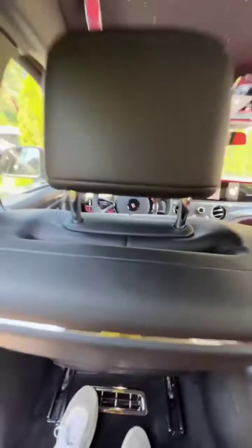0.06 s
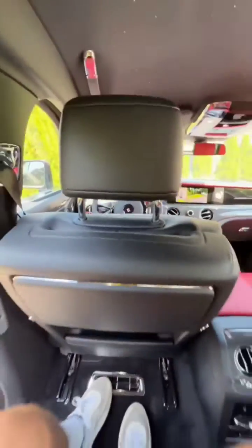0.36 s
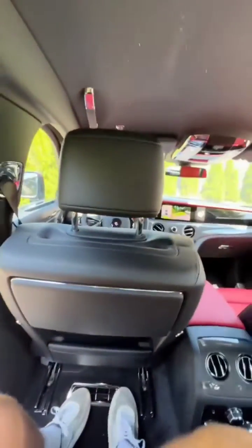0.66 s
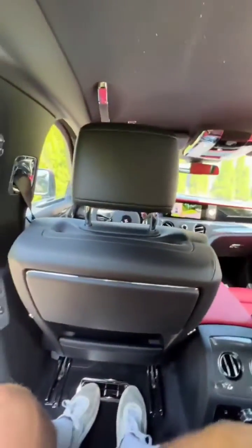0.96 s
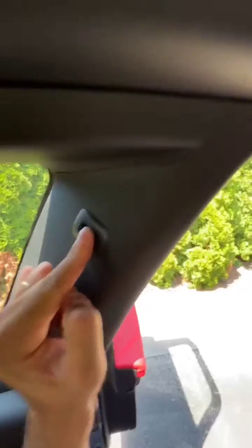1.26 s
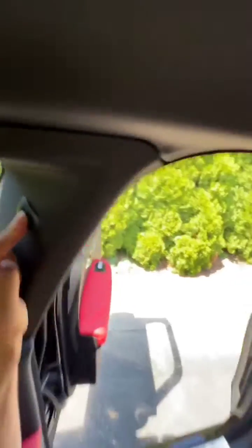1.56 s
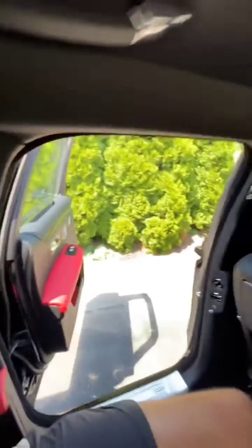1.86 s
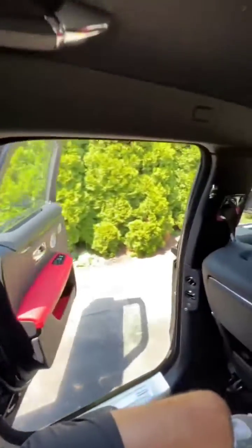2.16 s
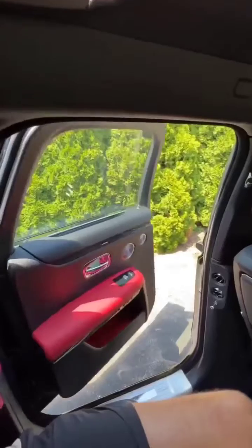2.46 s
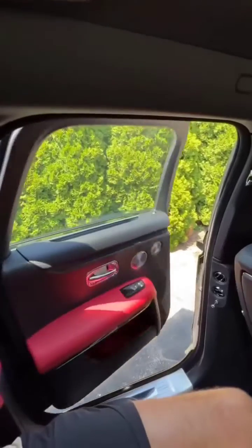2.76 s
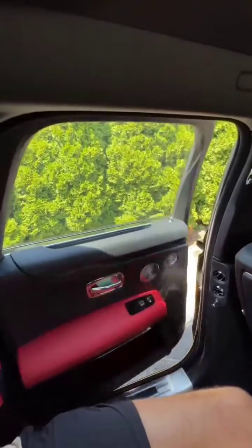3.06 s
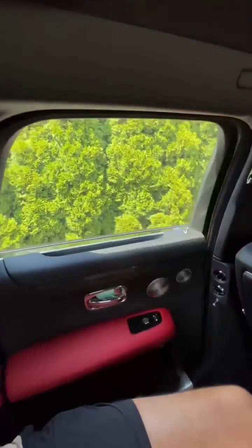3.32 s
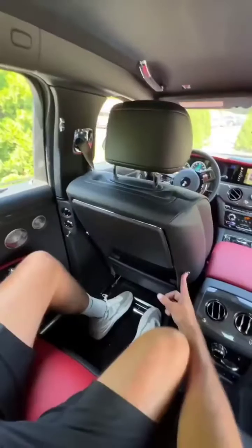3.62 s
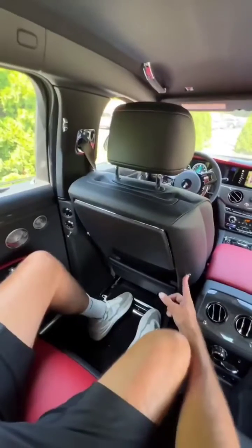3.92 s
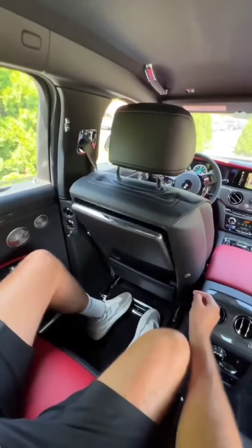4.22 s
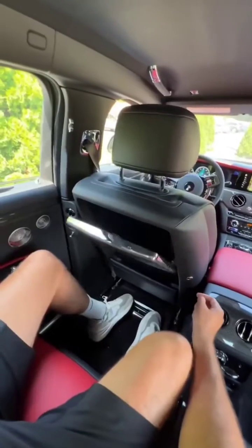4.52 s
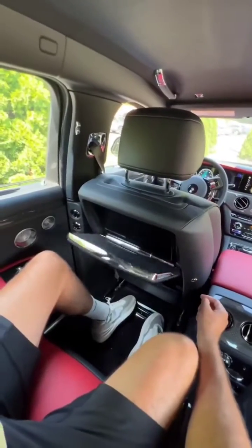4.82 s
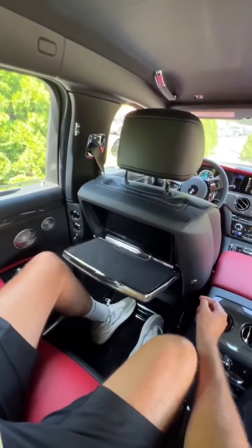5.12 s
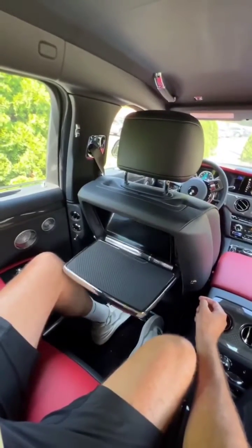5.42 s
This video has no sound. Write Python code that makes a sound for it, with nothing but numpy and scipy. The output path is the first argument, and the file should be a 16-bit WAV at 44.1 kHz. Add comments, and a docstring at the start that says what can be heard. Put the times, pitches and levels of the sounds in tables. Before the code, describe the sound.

From the back seat of a parked car, a low idling throb mixes with outdoor rumble and soft hiss through the open door. At about 1.1 seconds a button clicks sharply with a small thud. The powered door starts to whir, shifting to a drone from around 2.3 seconds while the outside hiss fades. At 3.5 seconds it bumps its seal and latches with a hard clack and a deep cabin boom, the loudest moment. Near 3.7 seconds the sound cuts abruptly to the low rumble of the closed cabin. At 4 seconds a switch knocks, then a catch clicks, ticks lightly, and a hinge clatters briefly at 4.3 seconds. Meanwhile a geared motor hums with a faint whine and buzz as it lowers a folding table, growing louder and brighter from 4.6 seconds. The tray knocks softly on its stop at about 5.7 seconds.

```python
"""Powered car door and picnic table

From the back seat of a parked car, the engine idles and outdoor noise comes through the open door.
A button clicks and the door whirs in, shutting out the hiss; it latches and the cabin booms.
The scene cuts abruptly to the closed cabin, where a switch knocks, a catch lets go
and a geared motor hums and whines as it lowers the table's tray onto its stop."""
import sys
import numpy as np
from scipy import signal
from scipy.fft import rfft, irfft
from scipy.io import wavfile
from scipy.ndimage import uniform_filter1d, map_coordinates

SR = 44100
rng = np.random.default_rng(int(sys.argv[2]) if len(sys.argv) > 2 else 0)


def transcribe(signal):
    """Save signal, clipped to [-1, 1], as a 16-bit WAV file at the path in sys.argv[1]."""
    frames = np.atleast_2d(signal).T
    limited = np.clip(frames, -1, 1)
    pcm = np.round(limited * 32767).astype(np.int16)
    wavfile.write(sys.argv[1], SR, pcm)


N = 250488
T = np.arange(N) / SR
FREQS = np.fft.rfftfreq(N, 1 / SR)
LOW_CUT_HZ, TOP_HZ = 39, 13200
BRAKE_S, HANDOVER_S = 2.245, 0.97  # when the door's drive goes from pulling to braking, and how slowly
LATCH_S, CUT_S = 3.487, 3.6696  # when the door latches, and when the second scene begins


def undb(db):
    """Turn decibels into a number to multiply by."""
    return np.exp(np.asarray(db) * np.log(10) / 20)


def unit(x):
    """Scale a signal to an average strength (rms) of 1."""
    return x / np.sqrt(np.mean(x ** 2))


def ramp(start_s, length_s):
    """A smooth rise from 0 to 1."""
    return np.sin(np.pi / 2 * np.clip((T - start_s) / length_s, 0, 1)) ** 2


def release(start_s, t60):
    """Stay at 1 until start_s, then die away; t60 is the seconds it takes to fade by 60 dB."""
    return undb(-60 * np.maximum(T - start_s, 0) / t60)


def bump(peak_s, width_s):
    """A soft swell up to 1 and back."""
    return np.exp(-((T - peak_s) / width_s) ** 2)


def wander(rate):
    """A smooth random wobble of about 1 either way, with `rate` new values a second."""
    steps = rng.standard_normal(int(T[-1] * rate) + 3)
    smooth = uniform_filter1d(np.repeat(steps, 8), size=8)
    return np.interp(T * rate * 8, np.arange(len(smooth)), unit(smooth))


def lowpass(x, hz):
    """Dull a sound by softening everything above hz."""
    return signal.sosfilt(signal.butter(2, min(hz, SR / 2 - 1), fs=SR, output="sos"), x)


def add(out, start_s, sound):
    """Mix a sound in at the given time."""
    i = int(start_s * SR)
    out[:, i:i + sound.shape[1]] += sound[:, :N - i]


# Stereo width, how strong the left-right contrast is next to what both sides share: f/Hz, level/dB
WIDTH = [(60, -26), (140, -34.5), (300, -15), (600, 3), (1200, -4), (2400, -5.5), (4000, -2.5),
         (9000, -0.5)]

def noise(colour, size=N):
    """Stereo noise of strength 1; its colour says how strong each frequency is next to the others."""
    hz = np.fft.rfftfreq(size, 1 / SR)
    colour_hz, colour_db = np.transpose(colour)
    shape = undb(np.interp(np.log(hz + 1), np.log(colour_hz), colour_db))
    bass_cut = np.minimum(hz / colour_hz[0], 1) ** 2 / (1 + (LOW_CUT_HZ / (hz + 1)) ** 8)
    mid, side = rfft(rng.standard_normal((2, size))) * shape * bass_cut
    width_hz, width_db = np.transpose(WIDTH)
    side = side * undb(np.interp(np.log(hz + 1), np.log(width_hz), width_db))
    return unit(irfft(np.array([mid + side, mid - side]), size))


def reflect(x, wet, t60, count=24):
    """Quick echoes off glass and trim reach the left and right at different times."""
    delays_s = rng.uniform(0.00084, .025, (2, count))
    response = np.zeros((2, SR // 10))
    response[:, 0] = 1
    for channel, delay in zip(response, delays_s):
        echoes = wet * rng.choice([-1, 1], count) * undb(-60 * delay / t60) / np.sqrt(count)
        channel[(delay * SR).astype(int)] += echoes
    return signal.fftconvolve(x, response, axes=1)[:, :x.shape[1]]


def flicker(x, depth_db, rate, count=14):
    """Narrow frequency bands above the bass each waver in level by themselves."""
    band_number = np.interp(np.log(FREQS + 1), np.log([400, TOP_HZ]), [0, count - 1])
    spectrum, out = rfft(x), 0
    for k in range(count):
        band = irfft(spectrum * np.maximum(1 - abs(band_number - k), 0), N)
        out = out + band * undb(depth_db * wander(rate) * min(k / 4, 1))
    return out


def strike(hits, tones, crack, tail_db, tail_t60, spread, pan_db):
    """Each hit makes a noisy crack and rings the part's own tones; a softer contact has less treble."""
    out, t = np.zeros((2, N)), T[:SR // 4]
    for start_s, ring_db, crack_db, crack_t60, contact_hz in hits:
        ring = 0
        for k, (hz, db, ring_t60) in enumerate(tones):
            # short waves reach the left and right out of step
            skew = spread * min(hz / 700, 1) * (-1) ** (k // 2) * np.array([[1], [-1]])
            ring = ring + (-1) ** k * undb(db - 60 * t / ring_t60) * np.sin(2 * np.pi * hz * t + skew)
        ring = ring * (1 - np.exp(-t / 0.00016))
        fade = undb(-60 * t / crack_t60) + undb(tail_db - 60 * t / tail_t60)
        sound = undb(ring_db) * ring + undb(crack_db) * fade * noise(crack, size=len(t))
        add(out, start_s, lowpass(sound, contact_hz))
    return out * undb([[pan_db / 2], [-pan_db / 2]])


# Colour of the background inside the closed car: f/Hz, level/dB
CABIN_COLOUR = [(48, 2.5), (120, -6), (165, -16.5), (270, -17.5), (480, -28), (800, -36.5), (1700, -44.5),
                (3000, -56), (6000, -58.5), (9000, -58.5), (12500, -95)]

def cabin():
    """The closed cabin is filled with a low, gently wavering rumble."""
    return noise(CABIN_COLOUR) * undb(-41 + wander(5.94))


def engine(firing_hz=72, level_db=-42):
    """The idling engine fires a little unevenly, making a low throb."""
    firing = np.sin(2 * np.pi * np.cumsum(firing_hz + 1.22 * wander(7.1)) / SR)
    return unit(firing) * undb(level_db + 2 * wander(9.1))


# Colour of the noise from outdoors: f/Hz, level/dB
OUTDOOR_COLOUR = [(45, 5), (70, 3), (110, 2.5), (150, -3.5), (260, -5.5), (440, -21), (500, -16.5),
                  (620, -21), (1000, -26), (1300, -31.5), (3000, -36.5), (7000, -46.5), (8000, -40.5),
                  (9300, -49.5), (12500, -71.5)]

def outdoors(split_hz=2600, rumble_db=-35.5, hiss_db=-59.5, leak_db=-30):
    """Noise comes in through the doorway; the narrowing gap shuts out the hiss but little rumble."""
    gap = np.clip((LATCH_S - T) / 0.7, 0, 1)  # 1 is open, 0 is shut
    turned = ramp(1, length_s=0.2)  # a little quieter once the passenger turns to the button
    air = reflect(noise(OUTDOOR_COLOUR), wet=0.57, t60=0.054)
    low = irfft(rfft(air) / (1 + (FREQS / split_hz) ** 4), N)
    rumble = unit(low) * undb(rumble_db - 1.18 * turned - 2 * (1 - gap) + 1.64 * wander(12))
    hiss = unit(air - low) * undb(hiss_db - 1.7 * turned + wander(15))
    return rumble + hiss * (gap + undb(leak_db))


def breeze(level_db=-46, gust_db=5):
    """Air buffets each side separately, most as the door swings, until the door shelters the seat."""
    band = signal.butter(3, [42, 90], "bandpass", fs=SR, output="sos")
    buffet = unit(signal.sosfilt(band, rng.standard_normal((2, N))))
    gusts = undb(level_db + gust_db * bump(BRAKE_S, width_s=.3) + 0.54 * wander(4.4))
    return buffet * gusts * (1 - ramp(BRAKE_S, length_s=0.22))


# Clothes and fingers brushing the leather: t/s, level/dB, width/s
BRUSHES = [(0.45, -60, 0.012), (2.382, -59, 0.1), (2.802, -58, 0.023), (3.928, -69, 0.0088),
           (3.999, -66.5, 0.014)]
# Colour of rubbing cloth: f/Hz, level/dB
CLOTH_COLOUR = [(1500, 5.5), (3200, 1), (6500, -2.5), (8200, 5.5), (10500, -18), (12500, -25)]

def passenger(stir_db=-70, crinkle_db=4, reach_db=-35):
    """Cloth crinkles faintly as the passenger shifts; reaching for the button makes a dull rumble."""
    stir = undb(stir_db + 4 * wander(8.83)) * (1 - ramp(BRAKE_S, HANDOVER_S))
    brushes = sum(undb(db) * bump(peak_s, width_s) for peak_s, db, width_s in BRUSHES)
    cloth = unit(noise(CLOTH_COLOUR) * undb(crinkle_db * wander(200)))
    reach = lowpass(noise(OUTDOOR_COLOUR), hz=2500) * undb(reach_db) * bump(1.1, width_s=0.066)
    return cloth * (stir + brushes) + reach


# The door button goes in, comes out and settles: t/s, ring/dB, crack/dB, crack fade/s, treble limit/Hz
BUTTON_HITS = [(1.1268, -22.5, -36, 0.0046, 12000), (1.141, -54, -53, 0.02, 9000),
               (1.170, -44, -42.5, 0.023, 6000), (1.176, -53, -44, 0.024, 14000),
               (1.1925, -56, -46, .012, 4000)]
# Tones the button rings with: f/Hz, level/dB, fade/s
BUTTON_TONES = [(334, 3.5, 0.04), (422, -1.5, 0.043), (760, -3.5, 0.04), (640, -7, 0.035), (970, -7, 0.025),
                (1170, -8, 0.01), (2290, -17, 0.012)]
# Colour of its crack: f/Hz, level/dB
BUTTON_CRACK = [(300, -13), (1100, -5), (2200, -5), (4500, -15), (7500, -12), (12000, -22)]

def button(snap_db=-22.5, rise_s=0.00027):
    """The button's dome flips over with one short push of air, and the button clicks in and out."""
    age = np.clip((T - BUTTON_HITS[0][0]) / rise_s, 0, 60)
    snap = undb(snap_db) * age * np.exp(1 - age)
    return snap + strike(BUTTON_HITS, BUTTON_TONES, BUTTON_CRACK,
                         tail_db=-9.5, tail_t60=0.18, spread=0.73, pan_db=2.5)


# Colours of the door's drive as it pulls and as it brakes: f/Hz, level/dB
PULL_COLOUR = [(180, -12.5), (280, 9.5), (390, 2), (445, -4.5), (500, 5.5), (600, -32.5), (1000, -24),
               (1500, -25), (1950, -9.5), (2300, -21.5), (5000, -54.5), (9000, -47.5)]
BRAKE_COLOUR = [(250, -9.5), (400, -4), (500, 3.5), (620, -18.5), (700, -10.5), (770, -18), (1000, -9),
                (1150, -10), (1300, -27), (1700, -17), (3000, -53)]
# Colour of the grainy hiss heard as the door latches: f/Hz, level/dB
GRAINY_HISS_COLOUR = [(400, -3), (1000, -3), (3000, -7.5), (4500, -15.5), (8000, -12.5), (12000, -28.5)]

def door_swing(pull_db=-49.5, brake_db=-44, ease_db_per_s=-6.5, strain_db=-43, hiss_db=-46.5):
    """The drive whirs, brakes with a drone and strains; a grainy hiss swells to the latch and fades."""
    braking = ramp(BRAKE_S, HANDOVER_S)
    swell = ramp(LATCH_S - 0.14, length_s=0.14)
    pull = undb(pull_db) * ramp(1.19, length_s=0.31) * np.sqrt(1 - braking)
    drone = undb(brake_db + ease_db_per_s * (T - BRAKE_S)) * np.sqrt(braking)
    brake = (drone + undb(strain_db) * swell ** 4) * release(LATCH_S, t60=0.27)
    drive = noise(PULL_COLOUR) * pull + noise(BRAKE_COLOUR) * brake
    grains = unit(noise(GRAINY_HISS_COLOUR) * undb(3.2 * wander(260)))
    hiss = grains * undb(hiss_db) * swell * release(LATCH_S + 0.034, t60=0.31)
    return drive * undb(wander(25.07)) + hiss


# The door nudges its seal; the latch strikes and the trim shudders:
# t/s, ring/dB, crack/dB, crack fade/s, treble limit/Hz
SEAL_HITS = [(3.4262, -22.5, -29, 0.03, 2400), (3.4355, -34, -38, .03, 1500)]
LATCH_HITS = [(3.4765, -36, -33, .02, 3000), (3.4828, -34, -21, 0.028, 7500),
              (3.4866, -14, -15, 0.016, 9050), (3.4935, -23.5, -20, 0.048, 4200),
              (3.498, -29.5, -26, 0.02, 8000), (3.5055, -43, -34, .012, 12100), (3.529, -42, -42, .04, 700),
              (3.586, -39, -44, .08, 500)]
# Tones of the door on its seal and as it latches: f/Hz, level/dB, fade/s
SEAL_TONES = [(243, -9, 0.12), (344, 0, .14), (780, -11, 0.055), (900, -6, 0.08)]
LATCH_TONES = [(254, -11, 0.2), (351, 4.5, 0.13), (427, 0, 0.07), (533, -6.5, 0.085), (685, -7, 0.1),
               (931, -15, 0.1), (1250, -17, 0.045), (1346, -17, 0.07), (1590, -3.5, 0.033),
               (1690, -5.5, 0.025), (1800, -16, .05), (2250, -7.5, 0.034), (2500, -15.5, .05),
               (2840, -15, 0.045), (3090, -21.5, 0.085), (3500, -11.5, 0.035), (5080, -14, 0.028),
               (5286, -12, 0.028), (5540, -17, .02), (6500, -22, 0.035), (7450, -25, .03)]
# Colour of the door's crack: f/Hz, level/dB
DOOR_CRACK = [(300, 10), (900, 1.5), (1600, -4), (3300, -6.5), (4300, -16), (5400, -8), (8000, -23),
              (12000, -37)]

def door_shut():
    """The door bumps its soft rubber seal, then the hard blows of the latch make it ring."""
    seal = strike(SEAL_HITS, SEAL_TONES, DOOR_CRACK, tail_db=-19, tail_t60=.15, spread=0.49, pan_db=-2)
    latch = strike(LATCH_HITS, LATCH_TONES, DOOR_CRACK,
                   tail_db=-21.5, tail_t60=0.12, spread=0.6, pan_db=-1)
    return seal + latch


# Soft pushes on the trim and the cabin air: t/s, level/dB, f/Hz, rise/s
THUMPS = [(1.122, -21.5, 106, 0.008), (3.489, -9, 54.4, 0.025), (3.490, -25.5, 89.4, 0.025),
          (3.4919, -18.5, 218, 0.0068), (3.5051, -9.5, 141.4, 0.0053), (3.51, -29, 35.8, 0.076),
          (3.566, -9, 54.3, 0.023)]

def thumps(spread=0.036):
    """Low tones swell and die: the button thuds, and the shutting door pumps the cabin air twice."""
    out, t = np.zeros((2, N)), T[:SR // 2]
    skew = spread * np.array([[-1], [1]])
    for start_s, db, hz, rise_s in THUMPS:
        swell = (t / rise_s * np.exp(1 - t / rise_s)) ** 0.75
        add(out, start_s, undb(db) * swell * np.sin(2 * np.pi * hz * t + skew))
    return out


# Knocks on the table's switch: t/s, ring/dB, crack/dB, crack fade/s, treble limit/Hz
SWITCH_HITS = [(3.675, -52, -48, 0.043, 4790), (3.686, -65.5, -43.5, 0.013, 9000),
               (4.035, -44, -45, 0.037, 2010), (4.041, -28.5, -32.5, 0.03, 5500),
               (4.0475, -31, -41, 0.043, 3000), (4.063, -45, -58, .025, 6000)]
# Tones the switch rings with: f/Hz, level/dB, fade/s
SWITCH_TONES = [(242, 5.5, 0.09), (336, 10, 0.057), (386, 0, 0.19), (482, -3, 0.084), (616, -7.5, 0.12),
                (753, -12, 0.1), (1084, -12, 0.049), (1577, -5, 0.048), (1756, -3, 0.034),
                (2180, -18, 0.044), (2880, -24, 0.032)]
# Colour of its crack: f/Hz, level/dB
SWITCH_CRACK = [(300, -17), (900, 14), (1700, 3), (3600, -0.5), (4600, -30), (8500, -31), (12000, -46)]

def switch():
    """The table's switch is knocked lightly, then harder, and rings briefly."""
    return strike(SWITCH_HITS, SWITCH_TONES, SWITCH_CRACK,
                  tail_db=-14.5, tail_t60=0.21, spread=0.41, pan_db=.5)


# The catch clicks and its small lever ticks: t/s, ring/dB, crack/dB, crack fade/s, treble limit/Hz
CATCH_HITS = [(4.022, -66, -53, 0.1, 14000), (4.1035, -38, -37, 0.043, 6900),
              (4.1105, -48, -37, 0.041, 14000), (4.120, -34, -40.5, .014, 16000)]
TICK_HITS = [(4.157, -62, -57, .035, 12000), (4.1935, -66, -52, .015, 14000),
             (4.1972, -57, -47.5, .02, 15000), (4.2375, -62, -53.5, 0.04, 14000)]
# Tones the catch rings with: f/Hz, level/dB, fade/s
CATCH_TONES = [(283.6, 9.5, 0.093), (553, -3.5, 0.057), (935, -4, 0.057), (1390, -0.5, 0.035),
               (2120, -14, 0.055), (2680, -10, .035), (3940, -16, 0.045), (5222, -20, 0.046)]
# Colours of the crack of the table's parts and of the ticks: f/Hz, level/dB
TABLE_CRACK = [(300, 10), (1300, 0.5), (2200, -3), (3200, -1.5), (4800, -5.5), (6500, -7.5), (9500, -11.5),
               (12500, -31)]
TICK_CRACK = [(600, -4), (2200, 3), (4000, -1), (7000, 1), (10000, -8), (12500, -19)]

def catch(scrape_db=-63):
    """The catch clicks open, then ticks and scrapes as the tray pulls out of it."""
    clicks = strike(CATCH_HITS, CATCH_TONES, TABLE_CRACK,
                    tail_db=-10.5, tail_t60=0.19, spread=0.51, pan_db=-0.5)
    ticks = strike(TICK_HITS, CATCH_TONES, TICK_CRACK,
                   tail_db=-14, tail_t60=0.15, spread=0.47, pan_db=-0.5)
    scrape = noise(TABLE_CRACK) * undb(scrape_db) * bump(TICK_HITS[1][0], width_s=0.13)
    return clicks + ticks + scrape


# The hinge's clatter; then one knock of the tray on its stop, and a short click as the sound ends: t/s,
# ring/dB, crack/dB, crack fade/s, treble limit/Hz
HINGE_HITS = [(4.2795, -63, -48, 0.048, 14000), (4.2836, -39.5, -38.5, 0.021, 11000),
              (4.2875, -38.5, -38.5, .025, 3500), (4.2935, -47, -45, 0.018, 5000),
              (4.3015, -57, -47, 0.032, 5000)]
END_HITS = [(5.659, -40.5, -46, .08, 2000), (5.671, -47, -46, 0.088, 4500)]
# Tones of the hinge and of the tray: f/Hz, level/dB, fade/s
HINGE_TONES = [(285, -3.5, .1), (607, -2, 0.13), (1420, -1.5, 0.073), (1990, -12.5, .045),
               (2920, -7, 0.028), (3180, -4, 0.03), (3955, -12, .045), (5010, -6, .028), (5720, 0, 0.028),
               (6520, 0, 0.037)]
TRAY_TONES = [(352, -1, 0.12), (940, -5, 0.15)]

def tray():
    """The hinge clatters; later the tray knocks once on its stop, and the sound ends on a short click."""
    hinge = strike(HINGE_HITS, HINGE_TONES, TABLE_CRACK,
                   tail_db=-12.5, tail_t60=0.15, spread=0.49, pan_db=0)
    ending = strike(END_HITS, TRAY_TONES, TABLE_CRACK, tail_db=-13, tail_t60=0.16, spread=0.54, pan_db=-1)
    return hinge + ending


# Tones in the motor's whine: cycles per turn of the shaft, starting level/dB
WHINE_TONES = [(5, -65), (8, -59.5), (10, -75), (12, -77), (14, -75), (16, -74), (18, -80.5), (21, -82),
               (22, -72.5), (23, -80), (24, -81), (50, -92), (52, -91), (56, -85), (57, -92)]
# Colours of the gears' rustle and of their teeth's buzz: f/Hz, level/dB
GEAR_COLOUR = [(90, 5.5), (125, -5), (170, -17.5), (230, -25), (300, -6.5), (450, -23.5), (560, -43.5),
               (880, -24.5), (1200, -38.5), (1450, -31.5), (1950, -30), (2400, -43.5), (3500, -45.5),
               (5500, -56), (9000, -62), (12500, -84)]
TEETH_COLOUR = [(1500, 10), (2000, 3.5), (2300, 1.5), (3200, 0), (3750, -4), (4500, -6.5), (5800, -16),
                (6600, -4.5), (9000, -27.5)]

def table_motor(shaft_hz=61.56, hum_db=-39, gear_db=-45.5, buzz_db=-76, load_db=3):
    """The spinning shaft shakes the seat back, and the gears whine, rustle and buzz."""
    uncovered = ramp(4.59, length_s=0.56)  # louder and brighter as the tray swings clear of the motor
    speed = 1 + 0.0008 * wander(14) + .002 * wander(60)
    angle = 2 * np.pi * np.cumsum(shaft_hz * speed) / SR
    hum = unit(np.sin(angle + .25 * wander(16))) * undb(hum_db + 8.5 * uncovered + 2 * wander(30))
    whine = 0
    for cycles, db in WHINE_TONES:
        brighten_db = 2.3 * np.log2(cycles / 16.5) * uncovered
        level = undb(db + brighten_db + 2.8 * wander(18))
        whine = whine + level * unit(np.sin(cycles * angle + rng.uniform(0, 1.8, (2, 1))))
    whine = whine * undb(load_db * bump(END_HITS[0][0], width_s=0.3))  # works harder near the stop
    rustle = unit(reflect(noise(GEAR_COLOUR), wet=0.47, t60=0.13)) * undb(gear_db + 1.1 * wander(15))
    # the same teeth meet on every turn, so one short stretch of noise repeats
    one_turn = noise(TEETH_COLOUR, size=int(SR / shaft_hz))
    turn_samples = one_turn.shape[1]
    place = (angle / (2 * np.pi) * turn_samples) % turn_samples
    teeth = np.array([map_coordinates(side, [place], order=3, mode="grid-wrap") for side in one_turn])
    buzz = teeth * undb(buzz_db + 10 * uncovered)
    return (hum + whine + rustle + buzz) * ramp(4.07, length_s=0.04)


def scene():
    """First the door closes, then the table lowers; the cut between them chops the boom, which clicks."""
    before_cut = T < CUT_S
    closed_cabin = cabin()
    doorway = engine() + outdoors() + breeze() + door_swing()
    steady = np.where(before_cut, doorway, table_motor() + closed_cabin) + passenger()
    steady = flicker(steady, depth_db=1.2, rate=36)
    door_knocks = button() + door_shut() + thumps()
    table_knocks = switch() + catch() + tray()
    return steady + np.where(before_cut, door_knocks, table_knocks)


def record(dry, balance_db=.5):
    """The left side is a touch louder, and the highest treble is cut off."""
    heard = dry * undb([[balance_db / 2], [-balance_db / 2]])
    return signal.sosfilt(signal.ellip(8, .2, 70, TOP_HZ, fs=SR, output="sos"), heard)


dry = scene()
out = record(dry)
transcribe(out)
```